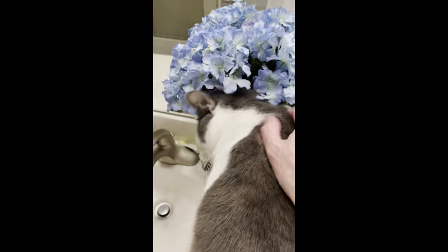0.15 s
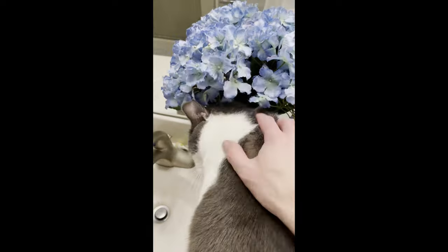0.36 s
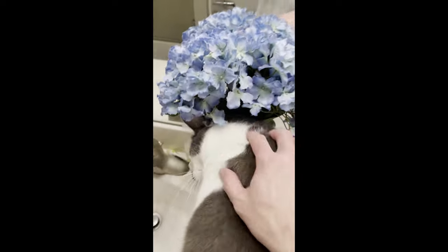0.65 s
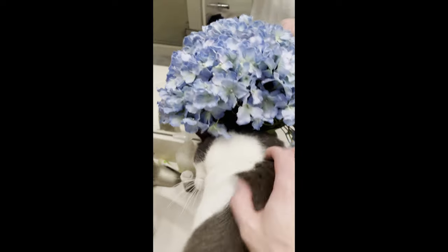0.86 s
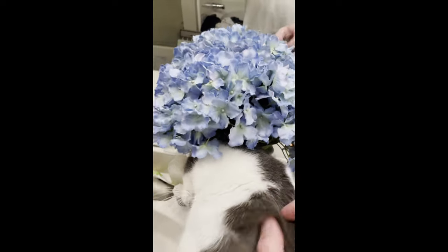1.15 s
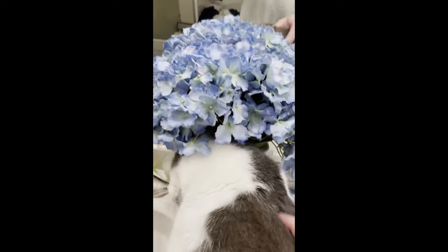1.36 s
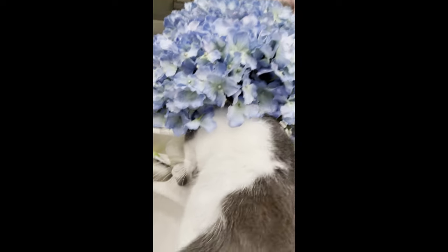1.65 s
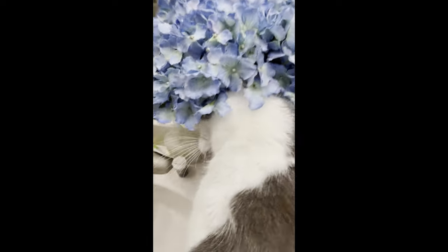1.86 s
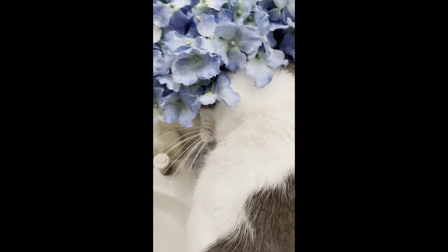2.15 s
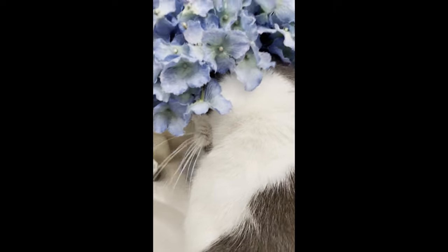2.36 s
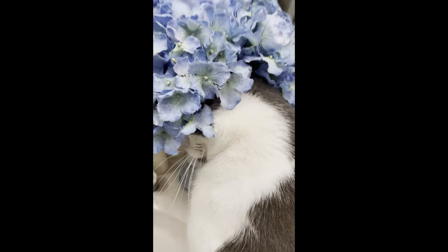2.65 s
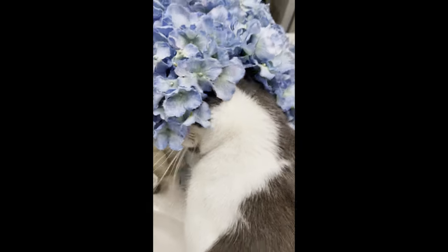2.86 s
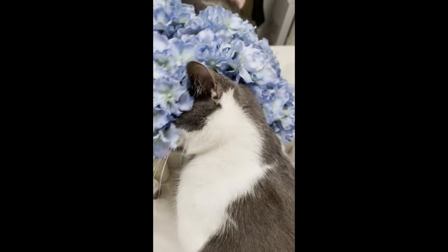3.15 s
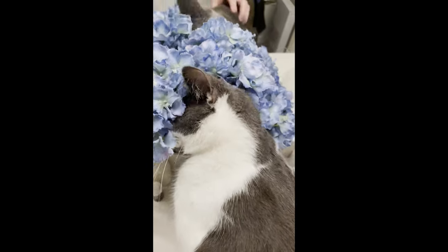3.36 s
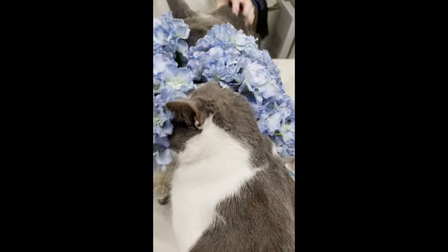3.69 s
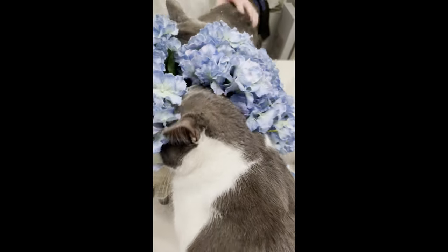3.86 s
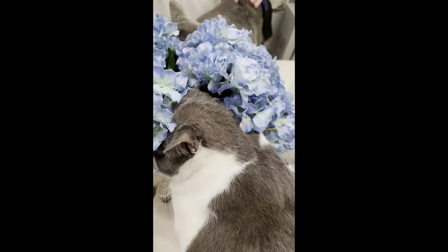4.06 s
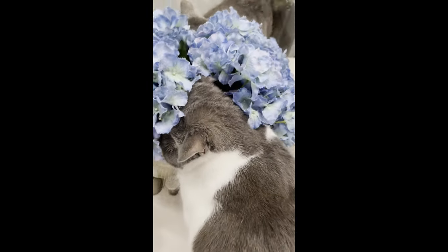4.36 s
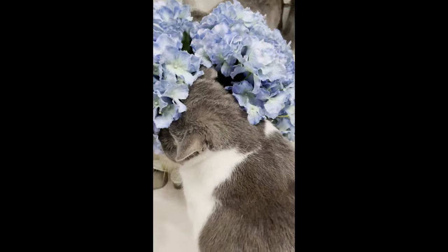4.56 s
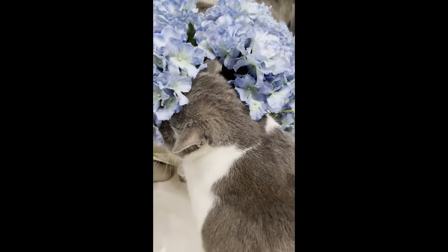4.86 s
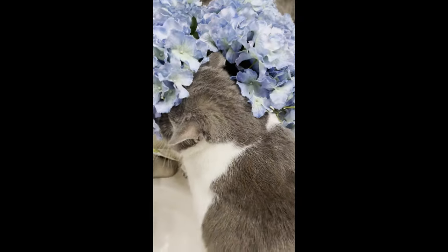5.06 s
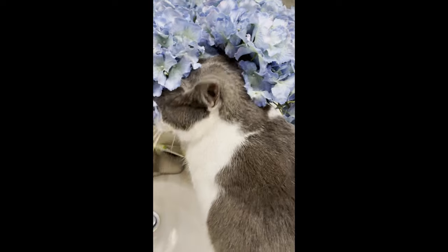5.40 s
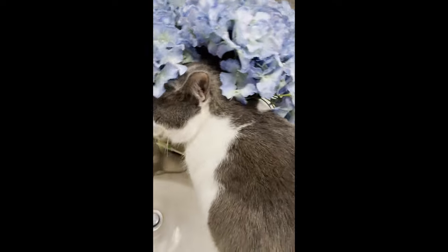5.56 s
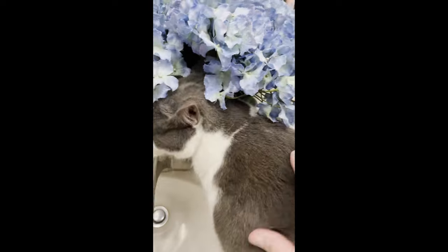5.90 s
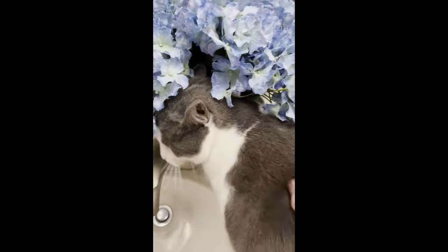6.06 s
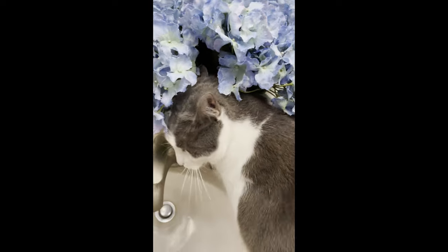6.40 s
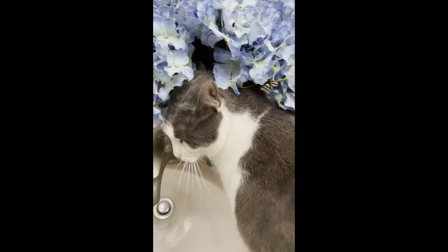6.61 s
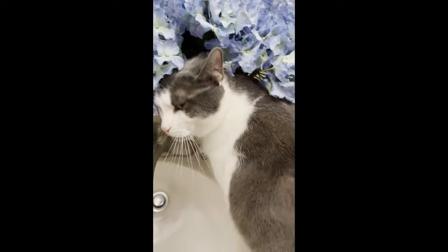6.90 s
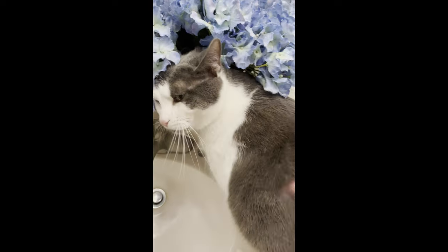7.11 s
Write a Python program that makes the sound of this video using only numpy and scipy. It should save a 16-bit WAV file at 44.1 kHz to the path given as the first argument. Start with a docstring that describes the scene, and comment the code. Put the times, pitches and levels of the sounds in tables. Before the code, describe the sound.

Throughout about seven seconds, a cat purrs close to the microphone in a small, lightly ringing bathroom. The purr is a low, rough flutter of roughly 25 cycles a second, stronger and weaker breaths alternating about every 0.4 seconds, humming a little in the hollow sink. Quick airy fur strokes come several times a second. Dry petals rustle from 0 to 1 second, 1.7 to 4, and 5.1 to 6. Faint thin squeaks sing at 0.1-0.5 and 2.1-2.8. A dull bump lands at 0.2, a sharp, hard basin knock at 0.8, softer thuds at 1.2-1.5, a clack at 2.2, muffled bumps at 3.1 and 3.6, another strong knock at 5.5 and a weak one at 6.4. Small ticks flick out, notably at 2.8, 3.3 and 5.4. The purr and light stroking continue to the end over quiet room air.

```python
"""A cat purrs close to the microphone in a bathroom sink, its fur swishing under quick strokes.
Petals rustle as it rubs its head on flowers, small ticks flick out, and thin rubbing squeaks sing.
The hollow basin and counter are bumped several times, and the small room rings briefly.
Purr: pulse trains through chest and basin modes. Fur, petals: shaped noise with grains.
Squeaks: wavering sines. Ticks: resonant noise bursts. Bumps: decaying modes, noise and a push."""
import sys
import numpy as np
from scipy import signal
from scipy.fft import rfft, irfft
from scipy.io import wavfile

SR = 44100
rng = np.random.default_rng(int(sys.argv[2]) if len(sys.argv) > 2 else 0)


def int16_out(signal):
    """Quantize to a 16-bit WAV file."""
    q = np.round(np.clip(np.atleast_2d(signal).T, -1, 1) * 32767)
    wavfile.write(sys.argv[1], SR, q.astype(np.int16))


N = 319284
TIME = np.arange(N) / SR
FREQS = np.fft.rfftfreq(N, 1 / SR)

# All table levels are relative; spectra are density_db.
# still air of the room: freq_hz, density_db
AIR_SPECTRUM = [(20, -18), (55, 7.5), (130, -6), (300, -14), (600, -32.5), (1500, -30), (6000, -34.5),
                (16000, -31.5)]
# chest and throat of the cat: freq_hz, density_db
CHEST_SPECTRUM = [(20, -30), (40, -12), (60, -8), (80, 0.5), (130, -4.5), (185, -2.5), (240, -12),
                  (350, -20), (600, -34), (1500, -56.5)]
# basin hollow humming with the purr: mode_hz, level_db, t60_s
HOLLOW_MODES = [(82, -1.5, 0.13), (125, 5, 0.37), (177.4, -14.5, 0.23)]
# breaths, in and out by turns, each lasting until the next: start_s, cycles_per_s, level_db
BREATHS = [(0.014, 31, -63.5), (.416, 24.5, -51), (0.965, 25.7, -73), (1.289, 29, -53),
           (1.712, 22.4, -68.5), (2.057, 27.5, -52), (2.651, 23.6, -59.5), (3.032, 25.1, -50.5),
           (3.342, 27.2, -59), (3.82, 25, -51), (4.275, 22.8, -73.5), (4.606, 24.3, -55), (5.041, 24, -64),
           (5.509, 26.5, -51), (5.975, 23.8, -66.5), (6.38, 27.9, -52.5), (6.761, 28.7, -63),
           (7.089, 27, -54)]
# breath shape: attack_s, release_s, slope_db_per_s, mid_cycle_pulse_ratio
BREATH_IN, BREATH_OUT = (0.13, 0.06, 0, 0.75), (0.018, 0.09, -3, 0.5)
PURR_REST_DB = -67.5  # the purr never quite stops as the breath turns
# strokes through the fur: peak_s, width_s (between 1/e points), speed_db, petal_stir_db (re speed)
STROKES = [(0.011, 0.13, -65, 4.5), (0.185, 0.15, -60.5, -1.5), (0.272, 0.093, -61.5, -6),
           (0.397, 0.16, -62, -2), (0.581, 0.11, -70, 3), (0.734, 0.069, -66.5, 0),
           (0.836, 0.12, -62.5, 8.5), (1.073, 0.14, -64, -2.5), (1.232, 0.076, -65, -3),
           (1.39, 0.077, -63.5, -1.5), (1.542, 0.23, -72.5, 3.5), (1.729, 0.089, -59, -10),
           (1.875, 0.18, -67.5, 0.5), (2.068, 0.092, -60, -7.5), (2.167, 0.2, -66.5, 0),
           (2.39, 0.1, -63, -5), (2.53, 0.26, -65, 2), (2.712, 0.13, -65.5, -9), (2.901, 0.42, -63.5, 0.5),
           (3.04, 0.1, -68, 7), (3.108, 0.13, -62, 1), (3.244, 0.15, -70, 3.5), (3.438, 0.066, -60, -9.5),
           (3.54, 0.11, -67.5, -0.5), (3.745, 0.42, -70, 0.5), (4.02, 0.13, -65.5, -4.5),
           (4.177, 0.11, -68, 2), (4.31, 0.14, -65, -4.5), (4.448, 0.11, -66.5, -8),
           (4.583, 0.1, -63.5, -11), (4.698, 0.072, -66.5, -8.5), (4.843, 0.11, -63.0, -12),
           (4.97, 0.09, -68, -5.5), (5.109, 0.1, -62, -12.5), (5.23, 0.1, -68, -8), (5.395, 0.085, -60, -7),
           (5.758, 0.079, -65, 1.5), (6.047, 0.12, -64, -3), (6.179, 0.1, -69.5, -3),
           (6.341, 0.11, -62.5, -4.5), (6.453, 0.11, -66.5, -3), (6.621, 0.08, -62, -5),
           (6.73, 0.11, -67.5, -5.5), (6.898, 0.11, -67.5, 0.5), (6.988, 0.11, -69, -7.5),
           (7.148, 0.067, -62.5, -9.5), (7.239, 0.09, -68, -4)]
# head pressing into the flowers: start_s, end_s, pressure_db
RUBS = [(-0.1, 0.565, -70), (0.558, 1.044, -72), (1.68, 2.422, -71.5), (2.385, 3.234, -80),
        (3.156, 3.622, -75.5), (3.517, 4.002, -67.5), (5.087, 5.985, -68)]
RUB_EASE_S, RUB_WANDER_DB = 0.11, 2.4
# swish of the hairs: freq_hz, density_db
FUR_SPECTRUM = [(300, -33), (1000, -25), (2200, -9), (3500, -7), (4800, -3), (6000, -3), (8300, -0.5),
                (11500, -1), (13700, -4.5), (16000, -13)]
# rustle of the petals: freq_hz, density_db
PETAL_SPECTRUM = [(150, 6), (350, 0), (600, 2.5), (1000, 2), (1400, -2.5), (2400, -1), (3600, -6),
                  (4800, -7.5), (6200, -11.5), (9000, -25.5), (16000, -15)]
# ticks of stems and petals: start_s, peak_db, pitch_hz, width_hz (of each resonance pass)
TICKS = [(.038, -59, 6200, 7160), (0.744, -58.5, 2140, 1500), (1.46, -62, 2180, 2570),
         (2.825, -61, 2130, 2630), (2.845, -48, 560, 187), (3.252, -55, 1900, 3070),
         (3.79, -58, 3000, 3920), (4.96, -72, 850, 196), (5.297, -59.5, 2440, 4420),
         (5.374, -56, 2500, 4500), (5.899, -60, 3230, 4430)]
# thin squeaks of rubbing: start_s, end_s, favoured_hz, level_db
SQUEAKS = [(.085, .25, 4100, -60.5), (.21, .44, 3700, -67), (.32, .47, 7000, -66), (2.11, 2.26, 1300, -66),
           (2.4, 2.85, 1700, -71.5)]
# lines of the rubbing squeak: line_hz, level_db
SQUEAK_LINES = [(1722, -1), (2700, -2), (3300, 0), (5370, 1), (5950, -8), (6300, -7), (6885, -2),
                (7620, -6)]
SQUEAK_FOCUS_DB_PER_OCT = 10  # fall of a line away from the favoured pitch
# bumps: start_s, strength_db, soft_lowpass_hz, weak_push_highpass_hz, crack_db, struck_spot_hz
BUMPS = [(0.167, -51.5, 606, 120, -30, 293), (0.1929, -32.5, 1300, 118, -19, 910),
         (0.424, -46, 430, 122, -29.5, 298), (0.669, -50.5, 766, 125, -29.5, 290),
         (0.809, -26.5, 856, 88, 1.5, 517), (1.2374, -38, 880, 118, -34, 910),
         (1.369, -47.5, 710, 119, -26, 302), (1.510, -41.5, 720, 100, -14.5, 202),
         (2.228, -34, 860, 105, 0, 764), (3.107, -50, 203, 68.7, -35, 182),
         (3.587, -46.5, 356, 113, -28, 231), (5.4867, -26.5, 860, 142, -5, 1760),
         (6.441, -47, 626, 110, -35, 200)]
# ringing of basin and counter: mode_hz, level_db, t60_s
BASIN_MODES = [(76.46, -9.5, 0.49), (130.9, -1.5, 0.27), (146.2, 3, 0.16), (189.4, 3, 0.12),
               (217, -6, 0.037), (250.8, -14.5, 0.4), (292.8, -7, 0.16), (328, -6, 0.24), (368.9, -3, 0.22),
               (452, -10.5, 0.16), (499.7, -3.5, 0.16), (541.4, -14, 0.24), (562.7, -6.5, 0.1),
               (612, -6.5, 0.072), (687.5, -10.5, 0.15), (753, -22.5, 0.32), (822, -35.5, 0.086),
               (1110, -10, 0.091), (1795, -2, 0.045), (2000, -24, 0.3), (2402, -5.5, 0.035),
               (3300, -12, .11), (3674, -11.5, 0.06), (3860, -22, 0.15)]
# dense, unresolved ring of a bump: freq_hz, density_db
CLATTER_SPECTRUM = [(50, -40.5), (130, 1.5), (400, -4.5), (650, -6), (1000, -14), (1400, -12.5),
                    (1780, -27), (2350, -18), (2800, -28), (3450, -16.5), (4700, -24.5), (6500, -29.5),
                    (12000, -39.5), (16000, -51.5)]
# basin fittings rung by hard contacts: mode_hz, level_db, t60_s
FITTING_MODES = [(1992, 0.5, 0.11), (2131, 0, 0.14), (2364, -2, 0.24), (3305, -12.5, 0.24),
                 (3540, -19, .22), (3787, -4.5, 0.23), (4700, -6, 0.18), (5770, -7.5, 0.18),
                 (6650, -21, 0.2), (7100, -24, 0.23)]
# room reverberation, scaled by a speed where used: freq_hz, t60_s
ROOM_DECAY = [(100, 0.49), (500, 0.37), (1500, .3), (4000, 0.31), (8000, 0.37), (16000, 0.045)]
# likeness of the two microphone ports, limited to 0-1 in use: freq_hz, likeness
LIKENESS = [(100, 1.2), (300, 0.64), (550, -0.27), (1000, 0), (2000, 1.2), (4000, 0.65), (8000, 0.56),
            (14000, 2.76)]
# phase by which the left port leads: freq_hz, lead_rad
PORT_LEAD = [(80, 0.14), (520, 0.27), (1400, 0), (4130, 1.28), (4650, 2.55), (5250, 5), (9040, 10.5),
             (11300, 10), (14600, 12)]
# overall tone, with a narrow gap near 10 kHz: freq_hz, gain_db
TONE = [(20, -3), (8500, -0.5), (9200, -7.5), (10100, -32), (10950, -1.5), (11600, 0.5), (16000, 2)]
EDGE_HZ = 15850


def amp(db):
    """Decibels to gain."""
    return 10 ** (np.asarray(db) / 20)


def unit(x):
    """Scales to rms 1."""
    return x / np.sqrt(np.mean(x ** 2) + 1e-20)


def read(points, hz):
    """Reads a curve on a log-frequency axis."""
    f, value = np.transpose(points)
    return np.interp(np.log(hz + 1), np.log(f + 1), value)


def add(mix, start_s, sound):
    """Mixes a sound in at a time."""
    part = mix[..., max(round(start_s * SR), 0):][..., :sound.shape[-1]]
    part += sound[..., :part.shape[-1]]


def colour(x, spectrum):
    """Filters by a spectrum in dB."""
    size = x.shape[-1]
    gain = amp(read(spectrum, np.fft.rfftfreq(size, 1 / SR)))
    return irfft(rfft(x) * gain, size)


def cut(x, hz, kind, order):
    """Causal low-pass or high-pass."""
    sos = signal.butter(order, np.clip(hz, 10, SR / 2 - 100), kind, fs=SR, output="sos")
    return signal.sosfilt(sos, x)


def spot(x, hz, width_hz):
    """One resonance of gain 1."""
    b, a = signal.iirpeak(min(hz, SR / 3), hz / width_hz, fs=SR)
    return signal.lfilter(b, a, x)


def drift(hz):
    """Random wavering of rms 1, with a Gaussian roll-off in frequency."""
    noise = rfft(rng.standard_normal(N))
    return unit(irfft(noise * np.exp(-(FREQS / hz) ** 2), N))


def decay(t, t60_s):
    """Exponential decay, 60 dB down after t60_s."""
    return np.exp(-np.log(1000) * t / t60_s)


def pair(x):
    """Turns two unrelated signals into partly alike left and right ones."""
    size = x.shape[-1]
    same = np.clip(read(LIKENESS, np.fft.rfftfreq(size, 1 / SR)), 0, 1)
    mid, side = rfft(x) * np.sqrt([(1 + same) / 2, (1 - same) / 2])
    return irfft([mid + side, mid - side], size)


def dying(x, speed):
    """Lets each band die away at a multiple of the room's rate."""
    hz, t, bands = signal.stft(x, SR, nperseg=256)
    fade = decay(speed * t, read(ROOM_DECAY, hz)[:, None])
    return signal.istft(bands * fade, SR, nperseg=256)[1][..., :x.shape[-1]]


def still_air():
    """Steady noise shaped as the still air of the room."""
    return amp(-65.0) * unit(pair(colour(rng.standard_normal((2, N)), AIR_SPECTRUM)))


def breath(start_s, end_s, cycles_per_s, level_db, shape, jitter_s=0.0011, uneven_db=2.07):
    """One breath's larynx pulses, two per cycle, and its strength, which swells and lets go."""
    attack_s, release_s, slope_db_per_s, second = shape
    beats_s = np.arange(start_s, end_s - 0.008, 0.5 / cycles_per_s)
    late, size = rng.standard_normal((64, 2))[:len(beats_s)].T
    at = np.clip(((beats_s + jitter_s * late) * SR).astype(int), 0, N - 1)
    alternate = np.where(np.arange(len(beats_s)) % 2, second, 1) / np.hypot(1, second)
    pulses = np.zeros(N)
    pulses[at] = amp(uneven_db * size) * alternate
    age_s = np.clip(TIME - start_s, 0, end_s - start_s)
    envelope = np.clip(np.minimum(age_s / attack_s, (end_s - TIME) / release_s), 0, 1)
    return pulses, amp(level_db + slope_db_per_s * age_s) * envelope


def purr():
    """Larynx pulses, cycling 22-31 times a second, thump the chest and hum in the basin."""
    ends_s = [row[0] for row in BREATHS[1:]] + [N / SR + BREATH_OUT[1]]
    pulses, effort = np.zeros(N), amp(PURR_REST_DB)
    for k, ((start_s, cycles_per_s, level_db), end_s) in enumerate(zip(BREATHS, ends_s)):
        shape = BREATH_OUT if k % 2 else BREATH_IN
        train, swell = breath(start_s, end_s, cycles_per_s, level_db, shape)
        pulses = pulses + train
        effort = np.hypot(effort, swell)
    flutter = 0.55 * rng.standard_normal(N)  # soft tissue flutters between the pulses
    thumps = unit(colour(unit(pulses) + flutter, CHEST_SPECTRUM))
    t, out = TIME[:SR // 3], thumps
    for hz, level_db, t60_s in HOLLOW_MODES:
        mode = np.cos(2 * np.pi * hz * t) * decay(t, t60_s)
        out = out + amp(level_db) * unit(signal.fftconvolve(thumps, mode)[:N])
    return effort * unit(out)


def stroking():
    """Each stroke gathers and loses speed in a smooth bell; returns fur speed and petal stir."""
    t = TIME[::64]
    bells = np.array([amp(speed_db) ** 2 * np.exp(-2 * (2 * (t - peak_s) / width_s) ** 2)
                      for peak_s, width_s, speed_db, _ in STROKES])
    stir_power = amp([row[3] for row in STROKES]) ** 2 @ bells
    speed = np.interp(TIME, t, np.sqrt(bells.sum(0)))
    stir = np.interp(TIME, t, np.sqrt(stir_power))
    return speed, stir


def rubbing():
    """Head pressure on the flowers: each rub eases in, holds unsteadily and eases out."""
    power = np.zeros(N)
    for start_s, end_s, pressure_db in RUBS:
        ease = np.clip(np.minimum(TIME - start_s, end_s - TIME) / RUB_EASE_S, 0, 1)
        power += (amp(pressure_db) * ease) ** 2
    return np.sqrt(power) * amp(RUB_WANDER_DB * drift(hz=8.7))


def friction(spectrum, grains_per_s, spread_db, grain_share, flicker_db):
    """Countless tiny slips merge into a hiss; a few larger ones stand out as grains."""
    sizes = amp(spread_db * np.minimum(rng.exponential(1, (2, N)), 4))
    signs = rng.choice([-1, 1], (2, N))
    grains = unit(sizes * signs * (rng.random((2, N)) < grains_per_s / SR))
    slips = rng.standard_normal((2, N)) + grain_share * grains
    slips = slips * amp(flicker_db * drift(hz=49.7))
    return unit(pair(colour(slips, spectrum)))


def fur(speed, pressure, stroke_db=2, rub_db=0):
    """Quick strokes swish through the coat; it also hisses as it slides along the flowers."""
    drive = np.hypot(amp(stroke_db) * speed, amp(rub_db) * pressure)
    return drive * friction(FUR_SPECTRUM, grains_per_s=1600, spread_db=3.5, grain_share=0.47,
                            flicker_db=1.5)


def petals(stir, pressure, stroke_db=0, rub_db=2.5):
    """The flowers rustle against the cat's head, and stir with each stroke."""
    drive = np.hypot(amp(stroke_db) * stir, amp(rub_db) * pressure)
    return drive * friction(PETAL_SPECTRUM, grains_per_s=400, spread_db=1.0, grain_share=0.48,
                            flicker_db=2.0)


def ticks(rise_s=0.0008, decay_s=0.004):
    """A stem or petal flicks free: milliseconds of noise, twice through one resonance."""
    t, out = TIME[:4096], np.zeros(N)
    for start_s, peak_db, hz, width_hz in TICKS:
        burst = rng.standard_normal(len(t)) * np.exp(-t / decay_s) * (1 - np.exp(-t / rise_s))
        tick = spot(spot(burst, hz, width_hz), hz, width_hz)
        add(out, start_s, amp(peak_db) * tick / abs(tick).max())
    return out


def squeaks(waver_hz=32, shimmer_db=3):
    """Stick-slip friction of rubbing sings in thin, wavering lines."""
    out = np.zeros(N)
    arches = [np.sin(np.pi * np.clip((TIME - start_s) / (end_s - start_s), 0, 1))
              for start_s, end_s, _, _ in SQUEAKS]
    for hz, line_db in SQUEAK_LINES:
        drive = np.zeros(N)
        for arch, (_, _, favoured_hz, level_db) in zip(arches, SQUEAKS):
            fall_db = SQUEAK_FOCUS_DB_PER_OCT * abs(np.log2(hz / favoured_hz))
            drive += arch * amp(level_db - fall_db)
        phase = 2 * np.pi * np.cumsum(hz + waver_hz * drift(hz=90)) / SR
        out += amp(line_db + shimmer_db * drift(hz=35)) * drive * np.sin(phase)
    return out


def fittings(t, uneven_db=2, split_hz=16):
    """High modes ring in close, beating pairs, a little differently per blow and port."""
    out = np.zeros((2, len(t)))
    for hz, level_db, t60_s in FITTING_MODES:
        for side in (-1, 1):
            split = side * split_hz * rng.random()
            phase = 2 * np.pi * ((hz + split) * t + rng.random((2, 1)))
            gain = amp(level_db + uneven_db * rng.standard_normal())
            out += gain * np.sin(phase) * decay(t, t60_s)
    return unit(pair(out))


def basin_ring(t, travel_s=0.00926, rise_s=0.0018):
    """Basin modes start after their travel time; low bending waves travel slowest."""
    ring = np.zeros(len(t))
    for hz, level_db, t60_s in BASIN_MODES:
        age_s = np.maximum(t - travel_s * np.sqrt(BASIN_MODES[0][0] / hz), 0)
        envelope = decay(age_s, t60_s) * (1 - np.exp(-age_s / rise_s))
        ring += amp(level_db) * np.sin(2 * np.pi * hz * age_s) * envelope
    return unit(ring)


def bumps(clatter_db=-3.0, clatter_speed=1.56, crack_hz=1600, push_db=-15, push_s=0.00029,
          spot_gain=0.65, spot_q=3.2, early_gain=1.04, early_s=0.013, fittings_db=-32):
    """Bumps push and ring the basin; soft contacts favour low modes, hard ones crack as well."""
    t, out = TIME[:SR * 2 // 3], np.zeros((2, N))
    ring = basin_ring(t)
    u = t / push_s
    push = unit(u * (2 - u) * np.exp(-u))  # the first shove reaches the microphone directly
    for start_s, strength_db, soft_hz, weak_hz, crack_db, spot_hz in BUMPS:
        noise = colour(rng.standard_normal((2, len(t))), CLATTER_SPECTRUM)
        clatter = dying(pair(noise), clatter_speed)
        clatter = clatter * (1 + early_gain * np.exp(-t / early_s))  # loudest during contact
        body = 0.22 * (ring + amp(clatter_db) * unit(clatter) + amp(push_db) * push)
        body = body + spot_gain * spot(body, spot_hz, spot_hz / spot_q)
        # crack_db acts twice on the fittings: hard contacts favour them
        hard = 0.84 * body + amp(fittings_db + crack_db) * fittings(t)
        crack = amp(crack_db) * cut(hard, crack_hz, "high", order=3)
        blow = cut(body, soft_hz, "low", order=4) + crack
        add(out, start_s, amp(strength_db) * cut(blow, weak_hz, "high", order=2))
    return out


def room(x):
    """A small tiled room answers with a short, dense tail."""
    noise = pair(rng.standard_normal((2, SR // 2)))
    tail = dying(noise, speed=0.92) * (1 - np.exp(-TIME[:SR // 2] / 0.029))
    return signal.fftconvolve(x, tail / np.linalg.norm(tail[0]), axes=1)[:, :N]


def scene():
    """Cat, flowers and basin over still air; only bumps and ticks excite the room."""
    speed, stir = stroking()
    pressure = rubbing()
    cat = amp(-0.5) * purr() + fur(speed, pressure)
    rubbed = petals(stir, pressure) + amp(4.0) * squeaks()
    knocks = amp(7.5) * ticks() + bumps()
    return still_air() + cat + rubbed + knocks + amp(-16) * room(knocks)


def record(dry):
    """Two spaced ports, the overall tone with a narrow gap near 10 kHz, then the band limit."""
    lead_rad = read(PORT_LEAD, FREQS) * np.array([[0.5], [-0.5]])
    ports = colour(irfft(rfft(dry) * np.exp(1j * lead_rad), N), TONE)
    lowpass = signal.firwin(511, EDGE_HZ, window=("kaiser", 9), fs=SR)
    return signal.oaconvolve(ports, lowpass[None], "same")


dry = scene()
out = record(dry)
int16_out(out)
```